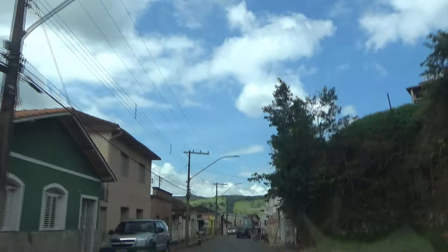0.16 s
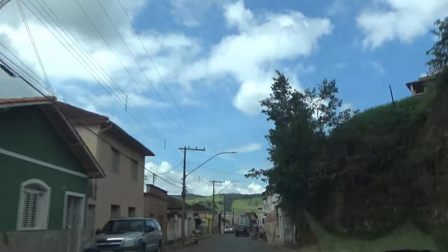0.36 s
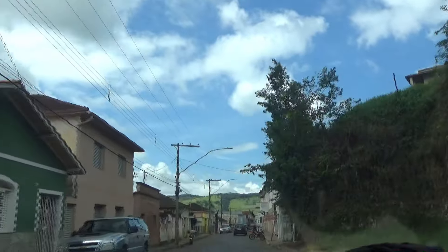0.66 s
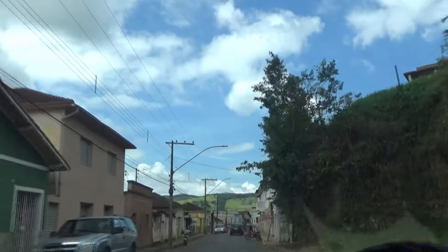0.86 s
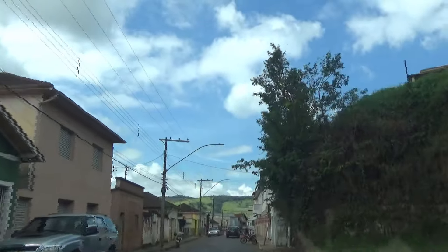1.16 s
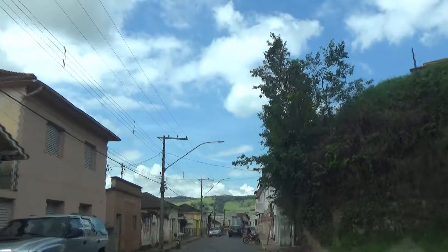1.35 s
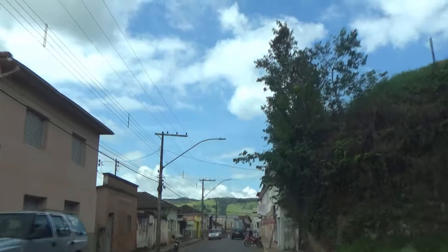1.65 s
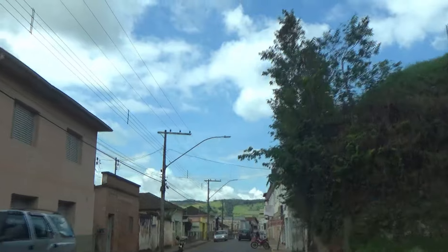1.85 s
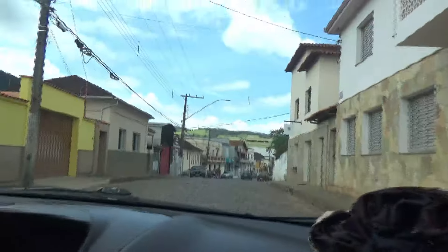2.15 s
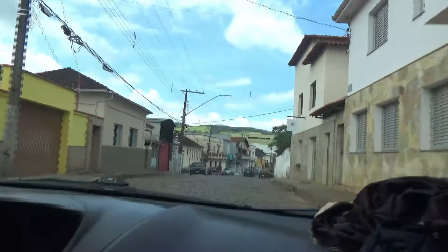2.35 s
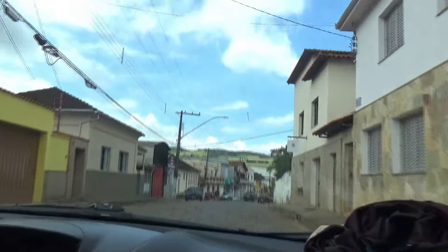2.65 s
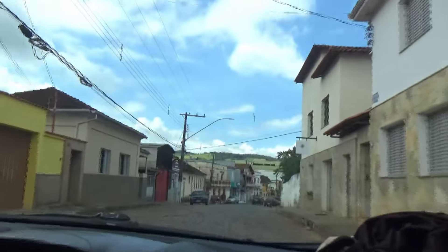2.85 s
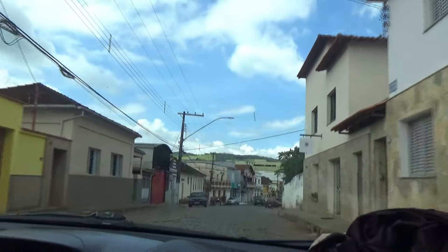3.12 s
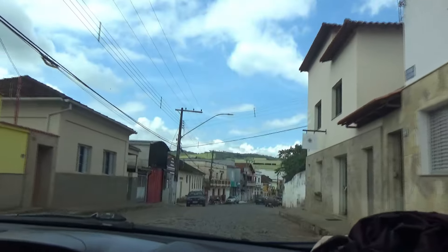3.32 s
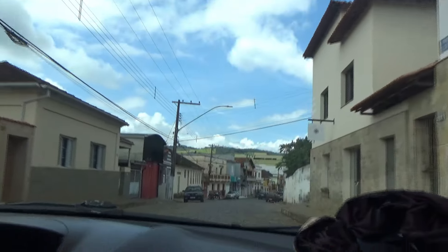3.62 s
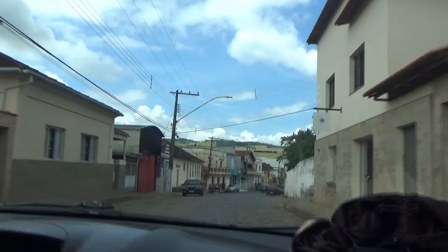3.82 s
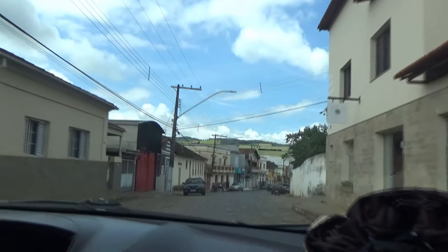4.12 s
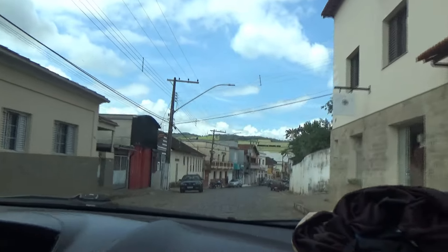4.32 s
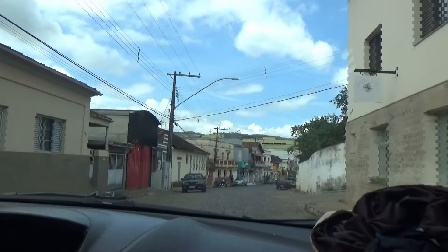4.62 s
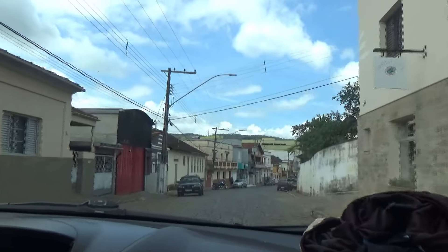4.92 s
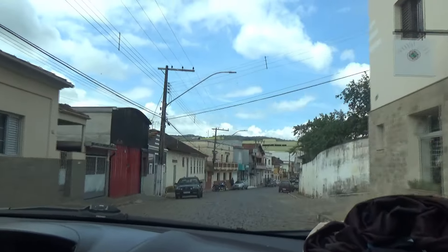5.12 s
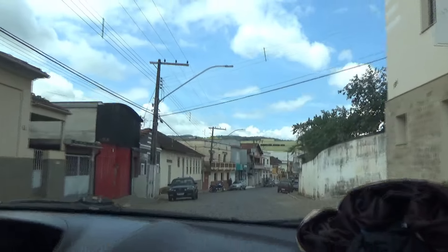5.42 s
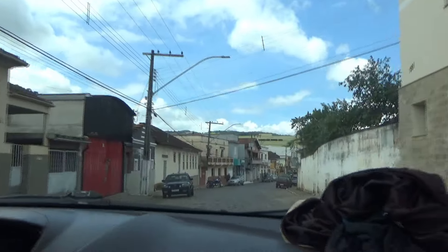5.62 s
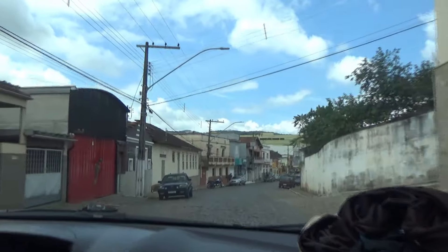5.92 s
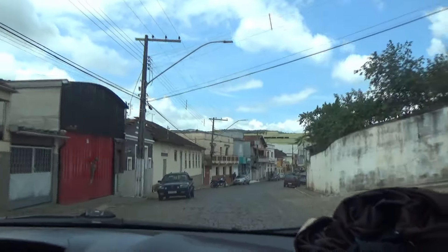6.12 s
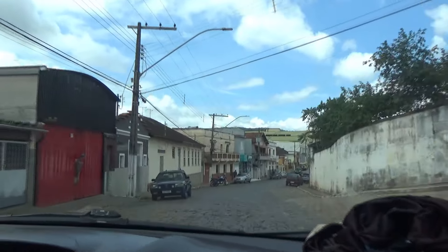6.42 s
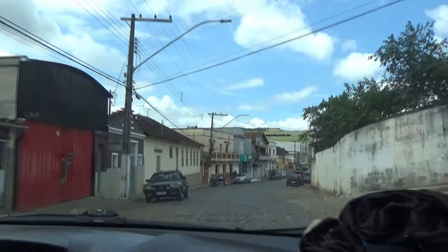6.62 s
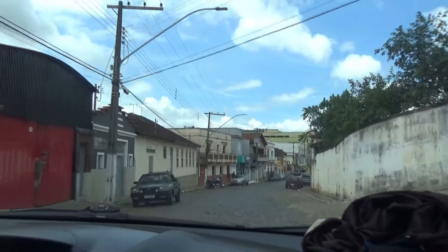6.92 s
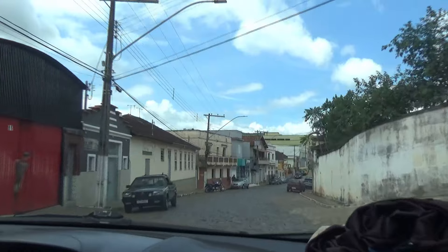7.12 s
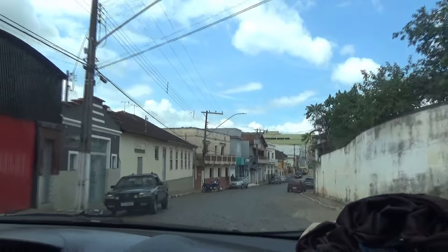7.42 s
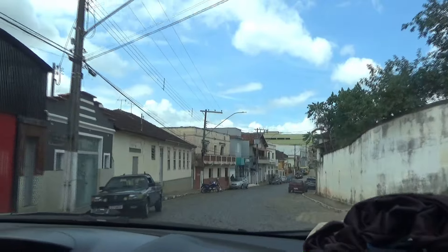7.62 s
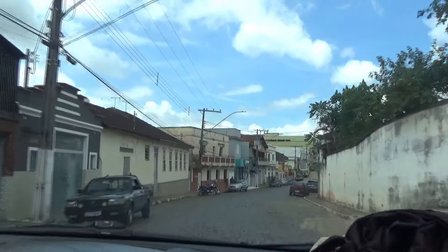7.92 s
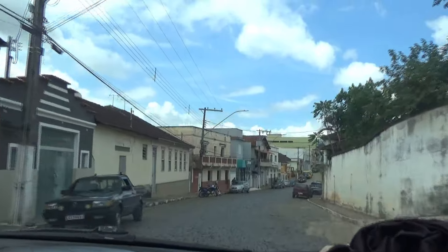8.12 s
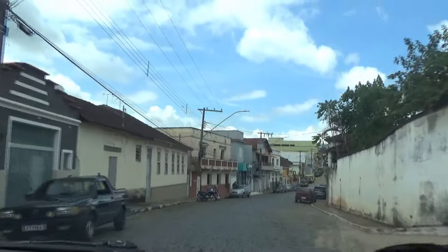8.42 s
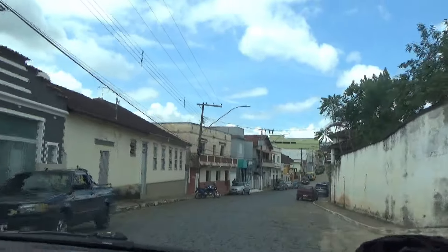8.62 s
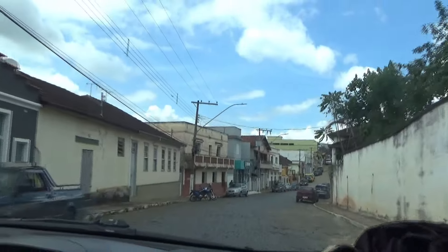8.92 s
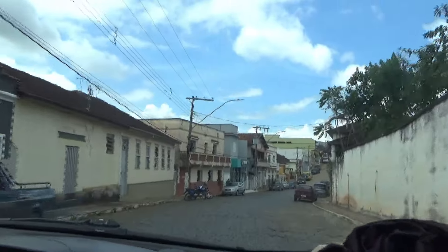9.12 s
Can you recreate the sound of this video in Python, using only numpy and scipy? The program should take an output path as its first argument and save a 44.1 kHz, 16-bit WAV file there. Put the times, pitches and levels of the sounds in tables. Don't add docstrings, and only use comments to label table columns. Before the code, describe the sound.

Car cabin on a rough stone street, low engine boom and tyre rumble under irregular trim chatter, sharp clicks, dull thumps and soft blower hiss.

```python
import sys
import numpy as np
from scipy import signal
from scipy.fft import rfft, irfft, next_fast_len
from scipy.io import wavfile
from scipy.ndimage import uniform_filter1d, minimum_filter1d, map_coordinates

SR = 44100
rng = np.random.default_rng(int(sys.argv[2]) if len(sys.argv) > 2 else 0)


def store_wav(level_fs):
    pcm = np.round(np.clip(np.atleast_2d(level_fs), -1, 1) * 32767)
    wavfile.write(sys.argv[1], SR, pcm.T.astype(np.int16))


def gain_from_db(level_db):
    decades = np.asarray(level_db, float) / 20
    return 10 ** decades


N = 408366
TRIM_RIGHT = 0.32


def unit(x):
    return x / np.sqrt(np.mean(x ** 2) + 1e-20)


def along(points, hz):
    f, v = np.transpose(points)
    return np.interp(np.log(hz + 1), np.log(f + 1), v)


def curves(rows):
    s, *columns = np.transpose(rows)
    return [np.interp(np.arange(N) / SR, s, column) for column in columns]


def sounding(rows, fade_s):
    t = np.arange(N) / SR
    return np.clip(np.minimum(t - rows[0][0], rows[-1][0] - t) / fade_s, 0, 1)


def around(times_s, reach_s, order, weights=1):
    t = np.arange(0, N + 64, 64) / SR
    humps = np.exp(-np.abs((t[:, None] - times_s) / reach_s) ** order)
    return np.interp(np.arange(N) / SR, t, (weights * humps).sum(axis=1))


def wobble(knots_per_s):
    steps = np.arange(0, N + 16, 16)
    knots = rng.standard_normal(int(N * knots_per_s / SR) + 4)
    return np.interp(np.arange(N), steps, map_coordinates(knots, [steps * knots_per_s / SR]))


def filtered(x, response):
    m = next_fast_len(N + SR // 2)
    return irfft(rfft(x, m) * response(np.fft.rfftfreq(m, 1 / SR)), m)[..., :N]


def modes(table):
    def response(f):
        return sum((-1) ** k * gain_from_db(db) * 1j * f * width / (hz * hz - f * f + 1j * f * width)
                   for k, (hz, width, db) in enumerate(table))
    return response


def noise():
    return rng.standard_normal((2, N))


def knocks(per_s, spread_db):
    hit = rng.random(N) < per_s / SR
    return hit * gain_from_db(spread_db * rng.exponential(size=N)) * noise()


def tone(hz):
    return np.sqrt(2) * np.sin(2 * np.pi * np.cumsum(hz) / SR)


def rings(events, t60_s, attack_s):
    out, t = np.zeros(N + SR), np.arange(SR // 8) / SR
    for s, db, hz in events:
        decay = gain_from_db(db - 60 * t / t60_s) * (1 - np.exp(-t / attack_s))
        out[round(s * SR):][:len(t)] += decay * np.sin(2 * np.pi * hz * t)
    return out[:N]


# resonance in Hz, width in Hz, level in dB.
DUCTS = [(735, 110, -47.5), (8400, 2600, -68)]
# middle in seconds, half length in seconds, lift in dB.
PUFFS = [
    (3.205, 0.026, 10),
    (3.562, 0.024, 12),
    (3.67, 0.031, 14),
    (8.693, 0.03, 8.5),
    (8.82, .045, 9),
    (1.593, 0.034, 1),
    (7.65, .03, 1.5),
    (9.15, 0.055, 7),
]


def fan():
    def duct(hz, width_hz, db):
        return gain_from_db(db) * unit(filtered(noise(), lambda f: modes([(hz, width_hz, 0)])(f) ** 2))
    *low, top = [duct(*row) for row in DUCTS]
    s, half_s, db = np.transpose(PUFFS)
    puff_db = around(s, half_s, order=2, weights=db)
    return (sum(low) + top * gain_from_db(puff_db)) * gain_from_db(2.55 * wobble(5))


# start in seconds, length in seconds, top in Hz, level in dB.
NOTES = [(5.693, .11, 5820, -48), (5.775, .09, 5810, -55), (5.85, .075, 5760, -63), (5.893, .11, 5370, -55),
         (6.03, .075, 5330, -53), (6.085, .1, 5400, -58), (6.2, .07, 5130, -59), (6.33, .07, 5200, -58),
         (6.445, .05, 5050, -53), (6.575, .05, 5050, -60), (6.92, .07, 5040, -62), (7.07, .06, 5060, -61),
         (7.76, .07, 4960, -61)]
# time in seconds, pitch in Hz, level in dB.
WISP = [
    (5.85, 5400, -68),
    (6.1, 5250, -65),
    (6.3, 5090, -66),
    (6.6, 5020, -65.5),
    (7.0, 5010, -66.5),
    (7.5, 5030, -66.5),
    (7.9, 4960, -68.5),
    (8.2, 4980, -73),
]
RISE_HZ, FALL_HZ, CREST = 270, 370, .48
FLATTEN_S, FLAT = .35, .25
HOARSE, HOARSE_PER_S = .35, 3


def bird():
    call, hoarse, jitter = np.zeros(N), wobble(320), wobble(50)
    for s, length_s, top_hz, db in NOTES:
        u = np.arange(round(length_s * SR)) / (length_s * SR)
        span = slice(round(s * SR), round(s * SR) + len(u))
        age_s = s - NOTES[0][0]
        depth = FLAT + (1 - FLAT) * np.exp(-(age_s / FLATTEN_S) ** 2)
        climb_hz = RISE_HZ * (1 - u / CREST) ** 2
        drop_hz = FALL_HZ * ((u - CREST) / (1 - CREST)) ** 2
        hz = top_hz - depth * np.where(u < CREST, climb_hz, drop_hz) + 20 * jitter[span]
        rough = min(HOARSE + HOARSE_PER_S * age_s, 1.1)
        whistle = tone(hz) + gain_from_db(-26) * tone(2 * hz)
        call[span] += whistle * unit(1 + rough * hoarse[span]) * gain_from_db(db) * np.sin(np.pi * u) ** 0.46
    hz, db = curves(WISP)
    smear = (.6 + wobble(280)) * tone(hz + 25 * wobble(12)) * gain_from_db(db + 1.3 * wobble(26))
    smear = smear * sounding(WISP, fade_s=.05)

    def echo():
        lags_s = .02 + .1 * rng.random(6)
        return sum(gain_from_db(-14 - 40 * lag) * np.roll(call, round(lag * SR)) for lag in lags_s)
    return call + smear + np.array([echo(), echo()])


# time in seconds, firing rate in Hz, boom in dB.
ENGINE = [(0.0, 34.64, -16), (0.49, 28.71, -13.5), (0.59, 31.21, -32.5), (0.9, 26.61, -17),
          (1.21, 26.26, -26), (1.93, 32.42, -21), (2.4, 27.91, -19), (3.12, 31.89, -21.5),
          (4.1, 29.84, -18.5), (4.69, 34.75, -16), (4.87, 29.01, -17), (5.52, 31.43, -23),
          (6.55, 29.56, -13.5), (6.91, 31.55, -26), (7.07, 27.39, -17), (7.37, 27.86, -28),
          (7.53, 30.81, -19), (9.26, 35.07, -21)]


def engine():
    hz, db = curves(ENGINE)
    uneven_db = 2.5 * wobble(3.633) + 0.77 * wobble(12)
    boom = tone(hz * (1 + 0.019 * wobble(6))) * gain_from_db(db - 0.5 + uneven_db)
    return np.array([boom, boom[::-1]])


# mode in Hz, width in Hz, level in dB.
HEAVE = [(28.3, 7.7, -3.5), (33.65, 4.3, 3.5), (54, 19, -7.5)]


def heave():
    return unit(filtered(noise(), lambda f: modes(HEAVE)(f) / (1 + (f / 60) ** 4)))


# mode in Hz, width in Hz, level in dB.
SHELL = [(104.1, 23, 1), (121.1, 28, 0), (160.5, 30.6, -11.5)]
# time in seconds, change of the drumming in dB.
STONES = [(0.13, 4), (0.27, 7), (0.36, 6), (0.41, -5.5), (0.86, 4.5), (1.08, 1.5), (1.19, 1), (1.39, 5.5),
          (1.5, 8), (1.63, 1), (1.77, 5), (1.87, 6), (2.04, 4.5), (2.09, -5), (2.17, 3), (2.3, -5.5),
          (2.34, 1.5), (2.52, 4), (2.73, 3), (2.82, -5.5), (3.29, -7), (3.36, 4), (3.59, 3), (3.67, -6.5),
          (3.97, 5.5), (4.14, -8.5), (4.23, 2.5), (4.31, -7), (4.38, 5.5), (4.44, -9), (4.56, 6.5),
          (4.86, -4.5), (5.06, 1.5), (5.11, -3.5), (5.37, -3.5), (5.47, 1.5), (5.62, -9.5), (5.74, 3),
          (5.85, 6.5), (5.99, -3), (6.07, 2), (6.11, -5), (6.41, -6.5), (6.78, 6), (6.91, 5), (7.35, 7.5),
          (7.491, 3.5), (7.65, 3.5), (7.82, 5), (8.31, 4.5), (9.13, -6), (9.23, 6.5)]
STONE_S, EVEN_S = 0.033, .07


def drum():
    strikes = unit(knocks(per_s=90, spread_db=1.0)) + 1.13 * noise()
    beat = unit(filtered(strikes, lambda f: modes(SHELL)(f) * (f / 100) ** 2 / (1 + (f / 150) ** 4)))
    power = np.abs(uniform_filter1d(beat[0] ** 2, size=round(EVEN_S * SR)))
    s, lift_db = np.transpose(STONES)
    return beat / np.sqrt(power + 0.13) * gain_from_db(around(s, STONE_S, order=2, weights=lift_db))


# frequency in Hz, density in dB per Hz.
ROAR = [(120, -7.5), (200, 0.5), (252, -6.5), (419, -12), (563, -19.5), (742, -21), (860, -21),
        (1060, -26.5), (2500, -41), (3250, -47), (5500, -120)]
# mode in Hz, width in Hz, level in dB.
CABIN = [(410, 70, -3), (730, 60, -2), (1080, 80, -2)]


def roar():
    tread = noise() + 0.34 * unit(knocks(per_s=300, spread_db=1.2))
    return unit(filtered(unit(tread), lambda f: gain_from_db(along(ROAR, f)) * (1 + abs(modes(CABIN)(f)))))


# frequency in Hz, density in dB per Hz.
BUZZ = [(710, 1), (1200, -1.5), (3910, -13.5), (8530, -20), (11500, -28.5), (14500, -36), (15500, -55),
        (16000, -75)]


def buzz(jolt_db):
    swarm = uniform_filter1d(np.abs(knocks(per_s=130, spread_db=.5)[0]), size=330)
    grit = gain_from_db(.7 * jolt_db) * (1 + .42 * unit(swarm)) * noise()
    return unit(filtered(grit, lambda f: gain_from_db(along(BUZZ, f))))


# middle in seconds, half length in seconds, lift in dB.
RUSTLES = [(0.751, 0.0052, 12), (0.884, 0.04, 7), (6.388, 0.025, 6), (1.54, 0.049, 4), (2.977, 0.059, -2.5),
           (7.863, 0.092, 2.5), (2.628, 0.018, 6.5), (6.666, 0.058, 5), (7.17, 0.015, 3.5),
           (8.339, 0.019, 11), (8.817, 0.05, 5.5), (8.871, 0.02, 6.5), (9.148, 0.022, 3)]
BUZZ_DB, BUZZ_FOLLOWS = -49, 0.18
AFTER_DB, AFTER_S = 1.5, 0.21


def shake_db(roar_db):
    near = around(np.transpose(JOLTS)[0], AFTER_S, order=2)
    s, half_s, db = np.transpose(RUSTLES)
    cloth_db = around(s, half_s, order=4, weights=db)
    follow_db = BUZZ_FOLLOWS * (roar_db - roar_db.mean())
    return BUZZ_DB + follow_db + AFTER_DB * np.sqrt(near) + cloth_db + .6 * wobble(9)


# time in seconds, stone height as drumming in dB, roughness as roar in dB.
ROAD = [(0.0, -22, -32), (0.15, -18.5, -32.5), (0.74, -20, -38), (0.85, -16, -31.5), (1.24, -21, -39),
        (1.39, -17, -32.5), (1.49, -19, -36.5), (1.62, -19, -37), (1.88, -17.5, -32.5), (1.99, -20, -37),
        (3.76, -19.5, -35), (7.61, -18.5, -36), (8.28, -20, -35.5), (8.36, -18.5, -28), (8.54, -18.5, -32),
        (9.0, -19, -36), (9.26, -18.5, -33.5)]
BUMP_DB, BUMP_S = 2.5, 0.013


def road():
    drum_db, roar_db = curves(ROAD)
    roar_db = roar_db + BUMP_DB * np.sqrt(around(np.transpose(THUMPS)[0], BUMP_S, order=2))
    jolt_db = 1.2 * wobble(14)
    low = gain_from_db(-20.5) * heave() + gain_from_db(drum_db) * drum()
    return low + gain_from_db(roar_db + 3.5 + jolt_db) * roar() + gain_from_db(shake_db(roar_db)) * buzz(jolt_db)


# time in seconds, peak in dB, note in Hz.
THUMPS = [(.11, -19.5, 350), (0.144, -19.5, 310), (0.2, -16.5, 330), (0.269, -21, 238), (0.279, -19, 473),
          (0.422, -31.5, 333), (0.548, -24.5, 415), (0.627, -20, 296), (0.863, -13.5, 263),
          (0.924, -26, 296), (1.004, -22, 303), (1.73, -29, 298), (1.847, -13.5, 207), (1.875, -21, 270),
          (3.945, -20, 286), (5.324, -25.5, 325), (5.922, -28, 714), (6.551, -26, 422), (7.127, -27, 275),
          (7.322, -21.5, 323), (8.124, -23, 475), (8.336, -31, 806), (8.357, -25, 716), (8.901, -24.5, 295),
          (9.087, -21.5, 190), (3.819, -20, 323), (3.989, -33, 340), (5.799, -18, 290), (5.93, -21.5, 336),
          (5.999, -19.5, 438), (6.655, -17, 294), (7.365, -18.5, 306), (8.124, -22, 244),
          (8.318, -11.5, 225), (8.344, -15.5, 288), (8.368, -20, 300), (8.409, -16.5, 282),
          (8.431, -9.5, 281), (6.3, -17.5, 52), (6.4, -17, 55), (.55, -18, 52)]


def thumps():
    overtones = [(s, db - fall_db, hz * ratio)
                 for s, db, hz in THUMPS for ratio, fall_db in [(1.62, 15), (2.7, 19)]]
    low = rings(THUMPS, t60_s=0.061, attack_s=0.0019)
    return gain_from_db(1.3) * (low + rings(overtones, t60_s=0.029, attack_s=0.0018))


# time in seconds, peak in dB.
DASH = [(0.017, -30), (0.0645, -28), (0.563, -26), (0.7905, -35), (1.0296, -25), (1.9918, -35),
        (2.2087, -26), (2.33, -39), (3.788, -41), (3.8553, -38), (3.9592, -29), (4.056, -28), (4.262, -34),
        (4.5458, -25), (4.9343, -29), (5.682, -30), (5.9528, -32), (6.1716, -39), (6.2362, -33),
        (6.554, -27), (7.127, -37), (8.232, -32), (8.6068, -41)]
DASH_HZ, DASH_DB = 1081, -6.5
BODY_HZ, BODY_SPREAD, BODY_DB = 617, .25, -2


def dash_top():
    top = rings([(s, db, DASH_HZ) for s, db in DASH], t60_s=0.074, attack_s=0.0011)
    body_hz = BODY_HZ * np.exp(BODY_SPREAD * rng.standard_normal(len(DASH)))
    hollow = rings([(*row, hz) for row, hz in zip(DASH, body_hz)], t60_s=.04, attack_s=.001)
    return gain_from_db(DASH_DB) * top + gain_from_db(BODY_DB) * hollow


# time in seconds, peak in dB, note in Hz.
PIPS = [
    (2.0238, -37, 2430),
    (3.084, -38.5, 2470),
    (3.676, -36, 2406),
    (5.803, -39, 2450),
    (6.342, -42, 2780),
    (7.7677, -36, 2424),
    (8.6754, -36, 2480),
]
# time in seconds, peak in dB, note in Hz.
SCRAPE = [(.836, -31.5, 1500), (.838, -36, 3200), (.843, -38, 4630), (.86, -24, 900), (.862, -30, 1600),
          (.868, -29, 1080), (.882, -33, 1470), (.92, -32, 1510), (.93, -29, 950), (.94, -35, 1200),
          (9.053, -28.5, 740), (9.145, -29.5, 1040)]
# time in seconds, peak in dB, note in Hz.
PINGS = [(0.0633, -37, 2890), (0.5645, -24, 2420), (0.6365, -37, 2400), (0.7294, -38, 2300),
         (0.7914, -26, 2470), (0.893, -27, 2650), (1.031, -27, 2680), (1.0879, -26, 2340),
         (1.268, -29, 2390), (1.993, -31, 2610), (2.2097, -39, 2330), (2.255, -32, 2360),
         (2.3291, -19, 3820), (2.6744, -27, 2340), (3.793, -32, 2960), (3.9574, -35, 2660),
         (4.3464, -27, 2280), (4.5456, -24.5, 2340), (4.9362, -28, 2337), (5.9519, -25, 2133),
         (6.7365, -27.5, 2350), (7.1262, -27, 2320), (7.3582, -26, 2980), (8.2317, -24, 2430),
         (8.4015, -23, 2390), (8.457, -31, 2290)]
# time in seconds, peak in dB, note in Hz.
CHINKS = [(0.9901, -36, 5620), (1.1214, -43, 5250), (1.1608, -39, 5260), (1.2411, -36, 5460),
          (1.4142, -41, 5260), (1.4556, -42, 5150), (2.8529, -42, 5420), (4.2014, -38, 5400),
          (4.3594, -43, 5700), (4.8943, -35, 5500), (4.9756, -45, 5460), (5.0144, -44, 5450),
          (5.051, -33, 5420), (5.238, -35, 5410), (8.2831, -38, 5310), (8.5849, -35, 5230),
          (8.6284, -40, 5210)]


def pips():
    small = rings(PIPS + SCRAPE, t60_s=0.034, attack_s=.0006)
    panel = gain_from_db(-6.5) * rings(PINGS, t60_s=0.028, attack_s=0.00045)
    vent = gain_from_db(-6.5) * rings(CHINKS, t60_s=0.056, attack_s=.0004)
    return dash_top() + small + panel + vent


# time in seconds, peak in dB, panel share in dB, clip share in dB.
JOLTS = [(0.014, -29.5, -0.5, -13), (0.0636, -24, -7.5, -18), (0.287, -25.5, -9, -21),
         (0.5626, -24, -6.5, -15.5), (.635, -30, -2, -23), (0.788, -23.5, -8, -18), (0.839, -29.5, -7, -19),
         (0.8942, -25, -24, -15), (0.907, -27, 0, -23), (0.927, -31, -17, -17), (1.0284, -24, -3.5, -15),
         (1.2696, -26.5, -5, -18), (1.991, -26.5, -5.5, -23), (2.2095, -23, -3, -18),
         (2.33, -21.5, -4, -17), (2.6731, -14, -13.5, -20), (3.7557, -24.5, -9, -22),
         (3.7899, -26, -2.5, -20.5), (3.8535, -24, -9.5, -16), (4.0543, -25.5, -5, -19),
         (4.26, -27.5, -3.5, -17), (4.5464, -24.5, -2.5, -22), (4.9335, -26, -5, -24),
         (5.678, -25, -4, -18), (5.952, -18, -7.5, -18), (6.7352, -29.5, -3, -27),
         (7.126, -23.5, -4, -19.5), (7.3562, -22.5, -6, -12.5), (8.607, -29, -3, -14)]
# time in seconds, peak in dB.
KNOCKS = [(0.245, -37), (0.2703, -37), (0.729, -37.5), (.865, -37), (0.8834, -38), (1.0878, -32),
          (1.112, -37), (1.143, -32.5), (1.7863, -38.5), (1.829, -36.5), (1.868, -37), (2.025, -47),
          (2.063, -41), (2.3088, -38), (3.0908, -42), (3.677, -42.5), (3.958, -26), (4.346, -32),
          (5.066, -42.5), (5.51, -46), (6.169, -30), (6.234, -30.5), (6.3416, -40), (6.5514, -32),
          (7.767, -43), (8.4398, -35.5), (8.6734, -45), (8.8543, -39), (8.792, -43)]
# time in seconds, peak in dB.
SNAPS = [(.079, -27.5), (1.985, -47), (2.25, -35), (2.2534, -29), (2.283, -30), (2.811, -31.5),
         (8.2309, -22), (8.321, -36), (8.3775, -32), (8.4, -19), (8.4542, -35), (8.471, -18.5),
         (8.487, -33), (8.515, -35.5), (5.895, -41)]
# first in seconds, last in seconds, first in dB, last in dB.
BOUNCES = [(0.043, .044, -38, -38), (0.123, .25, -32.5, -43), (0.437, .436, -39, -36),
           (.711, .711, -38.5, -36), (0.99, .991, -32.5, -32), (1.079, 1.079, -34, -53),
           (3.459, 3.459, -34.5, -62), (3.928, 3.929, -37, -53), (1.121, 1.2413, -29.5, -31.5),
           (1.4135, 1.4544, -34, -34.5), (2.852, 2.8928, -28.5, -34.5), (3.3388, 3.3396, -36, -41),
           (3.895, 3.895, -32, -48), (4.154, 4.2834, -31.5, -32.5), (4.36, 4.4866, -30.5, -33.5),
           (4.849, 5.0514, -34.5, -30), (4.872, 4.872, -48, -38), (5.239, 5.352, -31.5, -41),
           (5.4304, 5.4693, -35.5, -38), (5.934, 5.975, -27, -28), (6.09, 6.09, -35.5, -53),
           (6.389, 6.39, -36, -43), (6.52, 6.52, -39, -49), (7.019, 7.0568, -40, -30),
           (7.158, 7.1988, -36.5, -32.5), (7.677, 7.678, -47, -29), (7.9, 7.9, -38, -38),
           (8.18, 8.18, -41, -44), (8.2826, 8.2833, -33, -23), (8.585, 8.6287, -29.5, -32)]
# time in seconds, peak in dB.
TAPS = [(0.424, -32), (0.542, -40), (0.9584, -32), (1.2824, -35), (1.3537, -31), (2.2553, -29),
        (2.2857, -37), (4.122, -35), (4.7303, -38), (5.091, -41), (5.9179, -35), (6.6475, -53),
        (7.254, -47), (8.0983, -48), (8.7695, -37), (8.8772, -44), (9.056, -45), (9.205, -38)]
# time in seconds, peak in dB.
GRAZES = [(1.526, -52), (1.542, -47), (1.575, -46), (1.62, -43), (1.648, -40), (1.745, -43), (6.625, -42),
          (6.828, -44), (8.81, -42), (8.886, -43), (5.925, -40)]
BOUNCE_S, TAP_DB = .041, -11
JOLT_VENT_DB = -12.5
# (panel dB, vent dB, clip dB)
KNOCK_SHARE, SNAP_SHARE, BOUNCE_SHARE = (0, -13, -20.5), (-9, -13.5, -11.5), (-10.5, -8, -17)


def contacts():
    rows = [(s, db, panel_db, JOLT_VENT_DB, clip_db) for s, db, panel_db, clip_db in JOLTS]
    rows += [(*row, *KNOCK_SHARE) for row in KNOCKS]
    rows += [(*row, *SNAP_SHARE) for row in SNAPS]
    for first_s, last_s, first_db, last_db in BOUNCES:
        count = round((last_s - first_s) / BOUNCE_S) + 1
        rows += [(s, db, *BOUNCE_SHARE) for s, db in np.linspace((first_s, first_db), (last_s, last_db), count)]
    rows += [(s, db + TAP_DB, *KNOCK_SHARE) for s, db in TAPS]
    return rows + [(*row, *BOUNCE_SHARE) for row in GRAZES]


# mode in Hz, width in Hz, level in dB.
PANEL = [(494, 160, 8), (1056, 122, 10.5), (1750, 530, 3.5), (2470, 280, 5), (2975, 215, 3.5)]
# mode in Hz, width in Hz, level in dB.
SLATS = [(3450, 420, 5.5), (4200, 350, 8), (4700, 1600, 3)]
# mode in Hz, width in Hz, level in dB.
VENT = [(5450, 120, 4.5), (6230, 380, 3.5), (6540, 160, 4.5), (7050, 240, 0.5)]
# mode in Hz, width in Hz, level in dB.
CLIP = [(7230, 1050, -1), (8800, 1160, 2), (10400, 1900, -3), (12500, 2000, -34)]


def rattles():
    s, db, panel_db, vent_db, clip_db = np.transpose(contacts())[:, :, None]
    t = np.arange(SR // 14) / SR
    dice = rng.standard_normal((len(s), 9, len(t)))
    dry_contact = np.abs(s - np.transpose(TICKS)[0]).min(axis=1, keepdims=True) < .004
    t60_s = np.where(dry_contact, .011, .065)
    chatter = gain_from_db(0.44 * uniform_filter1d(dice[:, 0], size=40, axis=1) * np.sqrt(40))
    first_hit = np.where(vent_db == BOUNCE_SHARE[1], .1, .6)
    shape = chatter * gain_from_db(-60 * t / t60_s) + first_hit * gain_from_db(-60 * t / .012)
    at = (np.round(s * SR).astype(int) + np.arange(len(t))).ravel()
    out = np.zeros((2, N))
    parts = [(PANEL, panel_db + 3.5, 450), (SLATS, -5, 2500), (VENT, vent_db + 7.5, 4500),
             (CLIP, clip_db + 14.0, 6500)]
    for k, (part, level_db, steep_hz) in enumerate(parts):
        hits = gain_from_db(db + level_db) * shape
        blows = np.array([np.bincount(at, (hits * dice[:, 1 + 2 * k + c]).ravel(), N + len(t))[:N]
                          for c in (0, 1)])

        def plastic(f):
            return modes(part)(f) * 1j * f / (steep_hz + 1j * f) / (1 + 1j * f / 14000) ** 5
        out += filtered(blows, plastic)
    return out - [[0], [TRIM_RIGHT]] * out[0]


# time in seconds, peak in dB, left minus right in dB.
TICKS = [(0.2862, -45, 4), (1.0874, -53, 3), (2.2478, -31, 8), (2.2553, -42, 3), (2.283, -27, 5),
         (2.328, -36, 3), (2.6733, -28, 4), (3.418, -50, 0), (3.577, -38, 2), (3.7559, -46, -7),
         (8.4715, -29.5, 8)]


def ticks():
    out, t = np.zeros((2, N + SR)), np.arange(SR // 100) / SR
    for s, db, pan_db in TICKS:
        snap = gain_from_db(db + 2.5 - 60 * t / 0.0082) * rng.standard_normal(len(t))
        out[:, round(s * SR):][:, :len(t)] += snap * gain_from_db([[pan_db / 2], [-pan_db / 2]])
    return filtered(out[:, :N], lambda f: (1j * f / (5000 + 1j * f)) ** 2 / (1 + 1j * f / 13000) ** 3)


# frequency in Hz, left-right likeness from 0 to 1.
ALIKE = [(30, 1), (70, 0.91), (120, 1), (300, 0.95), (900, 0.85), (1800, 0.68), (4500, 0.67), (9000, 0.94)]
# frequency in Hz, phase by which left leads in radians.
LEAD = [(25, 0.38), (80, 1.08), (200, 1.67), (450, 1.52), (900, 1.2), (2200, 0.64), (5000, 0.29),
        (8000, .02)]
# frequency in Hz, left minus right in dB.
LEAN = [(28, -0.3), (60, 1.5), (180, 0), (550, 0.5), (1650, 1), (4970, 1), (15000, -2)]


def ports(f):
    turn = np.arccos(np.clip(along(ALIKE, f), 0, 1)) / 2
    lead = along(LEAD, f) / 2
    gain = gain_from_db(along(LEAN, f) / 2) * np.exp(1j * lead)
    return np.array([[gain, gain * np.tan(turn)], [1 / gain, -np.tan(turn) / gain]]) / np.cos(lead)


def scene():
    field = fan() + bird() + engine() + road() + thumps() * [[1], [.3]]
    field = field + pips() * [[1], [-TRIM_RIGHT]] + rattles()
    return filtered(field[None], ports).sum(axis=1) + ticks()


def top_cut(x):
    return signal.sosfilt(signal.butter(12, 16510, fs=SR, output="sos"), x)


CUT_S, CUT_JUMP, CUT_SETTLE_S = 1.96507, (-.045, -.32), .006
TOP_HZ = 16000


def record(dry):
    need = np.minimum(1, .52 / (np.abs(dry).max(axis=0) + 1e-9)) ** .75
    gain = uniform_filter1d(minimum_filter1d(need, size=500), size=500)
    t = np.arange(N) / SR - CUT_S
    step = np.outer(CUT_JUMP, np.sign(t) * np.exp(-np.abs(t) / CUT_SETTLE_S) / 2)
    fade_out = np.clip((N - np.arange(N)) / 25, 0, 1)
    mix = filtered(dry * gain * fade_out + step, lambda f: f < TOP_HZ)
    return top_cut(mix)


dry = scene()
out = record(dry)
store_wav(out)
```